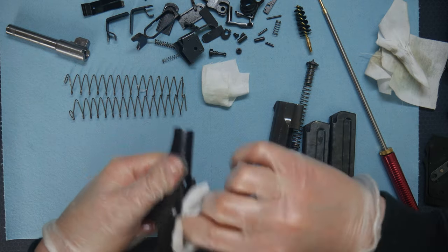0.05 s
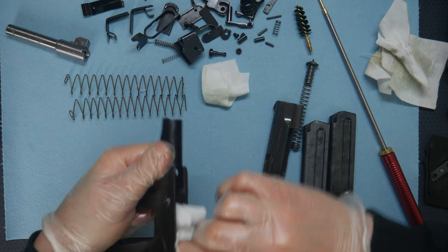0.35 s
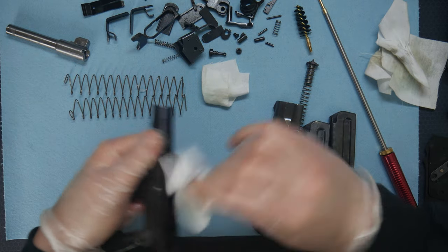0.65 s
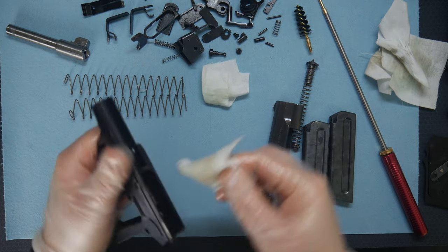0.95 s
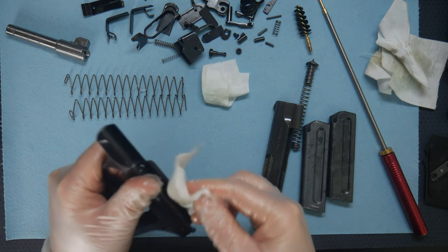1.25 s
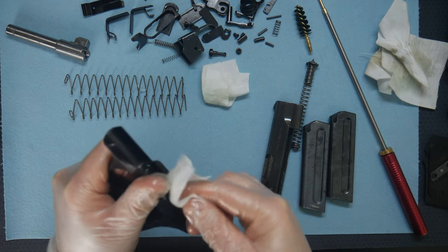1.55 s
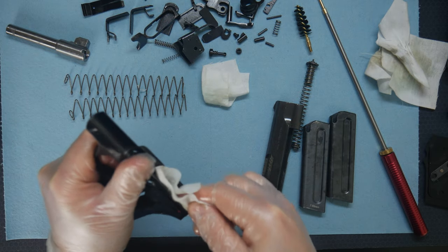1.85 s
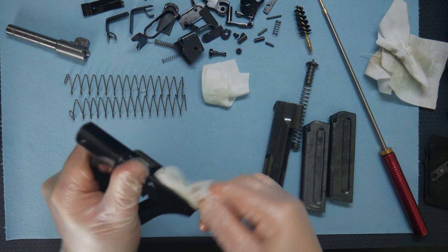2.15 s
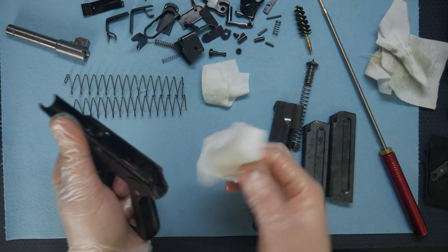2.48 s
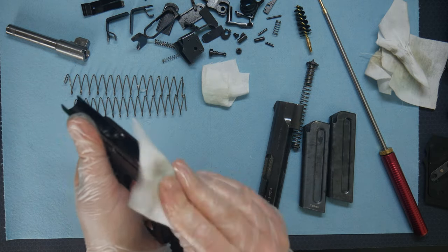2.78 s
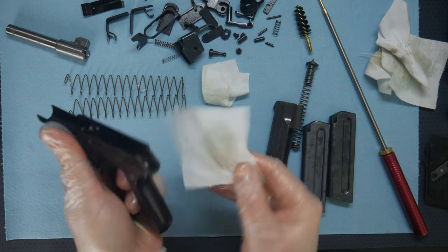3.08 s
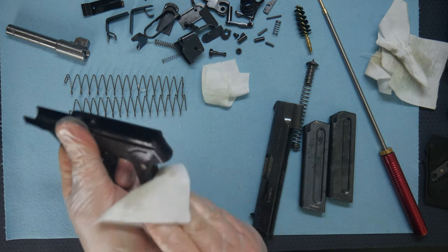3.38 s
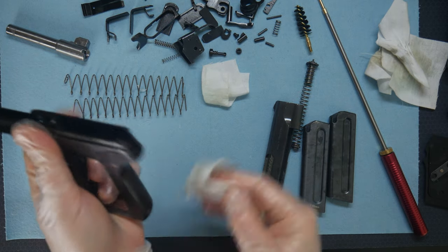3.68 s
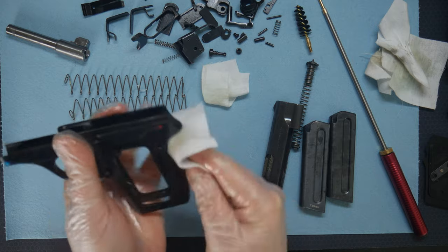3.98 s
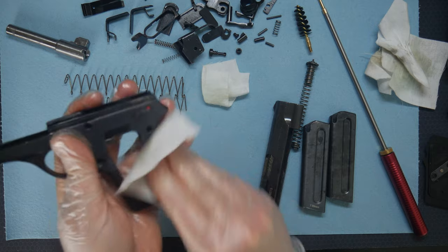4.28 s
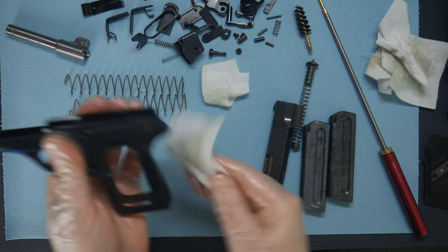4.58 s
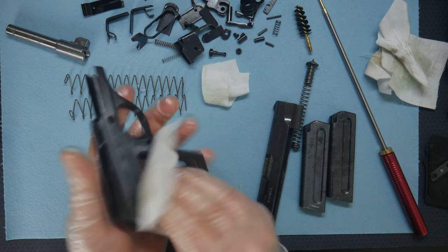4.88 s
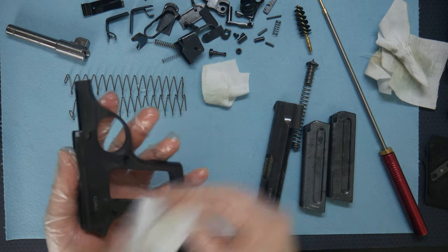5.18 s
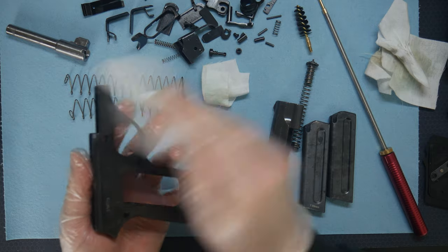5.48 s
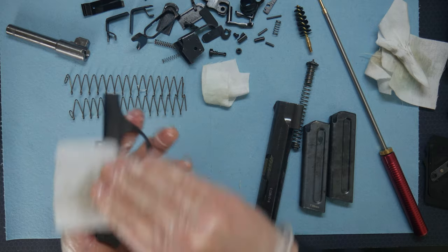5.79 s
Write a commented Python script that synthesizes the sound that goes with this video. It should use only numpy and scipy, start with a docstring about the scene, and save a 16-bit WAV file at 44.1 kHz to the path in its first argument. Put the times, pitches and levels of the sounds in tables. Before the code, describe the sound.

A short, bright swish of cloth on a metal pistol frame comes first, with a sharp little tick. Uneven wiping strokes follow, sparse at first and busier in the second half. Gloves rub dully on the grip, hands bump a padded table with soft, low thuds, and a metal edge squeaks faintly now and then. The microphone is close, in a small, quiet room.

```python
"""A short, bright swish of cloth on metal comes first: gloved hands wipe a pistol frame, close up.
Fibres catch and slip in uneven strokes, coloured by the frame's modes, and the gloves rub dully on
the grip. Threads snag with a tick, and now and then friction sets an edge singing softly.
The hands bump the padded work table, which thuds. The room is small and quiet; a noise suppressor
holds down the preamplifier hiss and a faint electrical whine."""
import sys
import numpy as np
from scipy import signal
from scipy.fft import rfft, irfft
from scipy.io import wavfile

SR = 44100
rng = np.random.default_rng(int(sys.argv[2]) if len(sys.argv) > 2 else 0)


def store_wav(level_fs):
    """Save 16-bit WAV to argv[1]."""
    pcm = np.round(np.clip(np.atleast_2d(level_fs), -1, 1) * 32767)
    wavfile.write(sys.argv[1], SR, pcm.T.astype(np.int16))


N = 261954
TIME = np.arange(N) / SR
FREQ = np.maximum(np.fft.rfftfreq(2 * N, 1 / SR), 1)

# Levels in the tables are relative, ahead of the mix.
# wiping strokes: middle t/s, length/s, level/dB, change in scrape with pressure/dB
WIPE_STROKES = [ (.043, .07, -50, 0), (0.253, 0.07, -49.5, 7), (.462, 0.071, -51, 0.5),
                (0.631, 0.077, -63.5, -2), (0.74, 0.26, -80.5, 9), (.868, .016, -62, 7.5),
                (1.501, 0.068, -66, -2.5), (1.716, .13, -51, 1), (2.23, 0.098, -65.5, 2.5),
                (2.419, 0.045, -61.5, -9.5), (2.857, 0.18, -66, -0.5), (3.093, 0.3, -70, 5),
                (3.357, 0.093, -52, -4.5), (3.494, 0.15, -58.5, -5), (3.651, .06, -66, 7),
                (3.78, 0.091, -55, -2), (3.866, 0.049, -58, 4), (3.92, 0.052, -52.5, 2.5),
                (4.015, 0.17, -64.5, -7), (4.145, 0.052, -58.5, -17), (4.276, 0.24, -58, -7),
                (4.377, 0.072, -68.5, 13), (4.533, 0.077, -64.5, -1), (4.689, .059, -53, -9.5),
                (4.768, 0.11, -58, -17), (4.869, 0.067, -52, -1), (4.953, 0.083, -58.5, -5.5),
                (5.042, 0.033, -56.5, -0.5), (5.167, 0.15, -60.5, 1), (5.179, 0.031, -44.5, -8),
                (5.622, 0.082, -56.5, 1.5), (5.77, 0.061, -51, -1), (5.843, 0.22, -58, -3)]
# the cloth whips off the end of the frame with a bright fizz: middle t/s, level/dB
CLOTH_FLICKS = [(4.871, -42.5), (5.18, -50)]
# the cloth's three tones, bright swish, midrange scrape and airy fizz: f/Hz, level/dB
SWISH_SPECTRUM = [(1500, -16.5), (3100, -3.5), (3800, 0.5), (5500, 8), (7800, 5.5), (9300, -1.5),
                  (11500, -13)]
SCRAPE_SPECTRUM = [(400, -21), (600, -8), (820, -5), (1080, -1.5), (1500, 1.5), (2200, 0.5), (3000, -3.5),
                   (4500, -2)]
FIZZ_SPECTRUM = [(6500, -20.5), (9000, -7.5), (11000, -15), (12500, -17), (15500, -21)]
# modes of the hand-damped frame: f/Hz, width/Hz, level/dB
FRAME_MODES = [(1690, 580, -29), (1975, 12, 1.5), (3770, 10, 9.5), (4064, 19.7, 12), (4566, 220, -1.5),
               (5150, 92, -5), (5990, 120, -2.5), (6480, 41, 8.5), (7080, 150, 0.5), (8250, 360, -2),
               (8800, 59, -14), (11600, 150, -4)]
# dull rub of a glove: f/Hz, level/dB
GLOVE_SPECTRUM = [(20, -0.5), (50, 6), (110, 3.5), (200, -2.5), (330, -8.5), (470, -1.5), (650, -8.5),
                  (1600, -37)]
# the holding hand takes a new grip: middle t/s, length/s, level/dB, hollow of the hand f/Hz
REGRIPS = [(0.276, 0.13, -60.5, 120), (0.582, 0.053, -70.5, 235), (0.944, 0.17, -76.5, 327),
           (2.206, 0.16, -65.5, 206), (2.796, 0.091, -60.5, 232), (3.296, 0.14, -64.5, 265),
           (3.514, 0.074, -59, 206), (3.689, 0.029, -58, 292), (4.208, 0.03, -53.5, 235),
           (4.383, 0.077, -65.5, 422), (5.127, 0.038, -60.5, 310), (5.381, .14, -60.5, 337)]
# the cloth catches on an edge and lets go: t/s, peak level/dB, band centre f/Hz
THREAD_SNAGS = [(0.2365, -28, 7600), (0.866, -46, 6000), (1.188, -51.5, 2600), (2.991, -61, 2920),
                (3.33, -44, 8860), (3.859, -41, 4540), (4.7475, -39.5, 4230), (5.039, -44.5, 5340),
                (5.6, -57, 5070), (5.776, -39, 5500)]
# a thin edge sings once the cloth bites on it: t/s, length/s, level/dB, mode f/Hz
EDGE_NOTES = [(0.246, .04, -47.5, 3770), (1.444, 0.096, -58.5, 3626), (1.684, 0.043, -47, 3984),
              (2.209, 0.057, -57.5, 3620), (2.81, .14, -64, 3654), (4.737, 0.085, -60, 3660)]
# hands bump the table: t/s, peak level/dB, contact time/s
TABLE_BUMPS = [(0.849, -48.5, 0.0021), (1.029, -44, 0.011), (1.149, -45, 0.018), (1.296, -53.5, 0.019),
               (1.545, -32.5, 0.003), (1.969, -31, 0.0037), (2.463, -35, 0.0035), (2.517, -35.5, 0.046),
               (2.918, -45.5, 0.0082), (3.327, -32.5, .0075), (3.368, -36.5, .018), (3.409, -38, 0.0028),
               (3.496, -45, 0.0036), (3.781, -36.5, .0043), (4.199, -41.5, 0.00051), (4.232, -36.5, 0.0037),
               (4.449, -40, 0.013), (4.625, -38, 0.0057), (5.025, -43.5, 0.0072), (5.237, -40, 0.0043),
               (5.699, -37.5, 0.0062)]
# low modes of the table: f/Hz, width/Hz, level/dB
TABLE_MODES = [(37.2, 6.3, 0.5), (58.8, 16.8, 12.5), (89, 9, -15), (157.5, 20, -8), (221.5, 57, -13.5)]
# preamplifier hiss: f/Hz, level/dB
HISS_SPECTRUM = [(50, 12), (130, 4.5), (300, 6), (700, 11), (2500, 1), (7000, 8.5), (11500, -1),
                 (15000, -12)]


def undb(db):
    """Decibels to gain."""
    return 10 ** (np.asarray(db) / 20)


def unit(x):
    """Scale to rms 1."""
    return x / np.sqrt(np.mean(x ** 2))


def through(x, response):
    """Filter by a frequency response."""
    return irfft(rfft(x, 2 * N) * response)[..., :N]


def colour(points):
    """EQ curve through (f/Hz, level/dB) points, falling 20 dB an octave beyond its ends."""
    hz, db = np.transpose(points)
    octaves_out = np.maximum(np.log2(hz[0] / FREQ), 0) + np.maximum(np.log2(FREQ / hz[-1]), 0)
    return undb(np.interp(np.log(FREQ), np.log(hz), db) - 20 * octaves_out)


def resonance(hz, width_hz):
    """Response of one mode, gain 1 at its centre."""
    return 1 / (1 + 1j * (FREQ / hz - hz / FREQ) * hz / width_hz)


def wander(rate_hz):
    """Random modulator with a spread near 1, gliding to a new value rate_hz times a second."""
    knots = rng.standard_normal(8192)
    return 1.2 * np.interp(TIME * rate_hz, np.arange(len(knots)), knots)


def swell(middle, length, flatness):
    """Envelope of one hand movement: it gathers speed and stops; about half strength at either end."""
    away = np.abs(TIME - middle)
    return np.exp(-(away / length) ** 4) / (1 + (2 * away / length) ** flatness)


def slips(per_s, scatter_db):
    """Friction grains: fibres let go at random moments, each with its own strength."""
    letting_go = rng.random(N) < per_s / SR
    return unit(letting_go * rng.standard_normal(N) * undb(scatter_db * rng.standard_normal(N)))


def drag(pressed=False):
    """Envelope of the wiping; pressed counts in how the pressure of each stroke changes its scrape."""
    return np.sqrt(sum((undb(db + pressed * press_db) * swell(middle, length, flatness=4.4)) ** 2
                       for middle, length, db, press_db in WIPE_STROKES))


def cloth(scrape_db=-9, fizz_db=-6, crackle_db=-11, brush_db=-82, flick_s=0.041):
    """Dense fibre slips swish over the frame; pressure adds scrape, flicks fizz, stiff creases crackle."""
    brush = undb(brush_db + 0.96 * np.tanh(wander(12)))  # loose cloth still brushes between strokes
    flicks = sum(undb(db) * swell(middle, flick_s, flatness=3.4) for middle, db in CLOTH_FLICKS)
    wipe = drag()
    swish = np.hypot(wipe, brush)
    scrape = np.hypot(undb(scrape_db) * drag(pressed=True), undb(-4) * brush)
    fizz = np.hypot(undb(fizz_db) * wipe, undb(-5) * brush + flicks)
    metal = 1 + sum(undb(db) * resonance(hz, width) for hz, width, db in FRAME_MODES)
    folds = undb(1.68 * wander(70) + 0.57 * wander(490))  # folds and weave make the drag uneven
    crackle = undb(crackle_db) * slips(per_s=140, scatter_db=1.5)
    out = 0
    for envelope, band in ((swish, SWISH_SPECTRUM), (scrape, SCRAPE_SPECTRUM), (fizz, FIZZ_SPECTRUM)):
        grains = slips(per_s=11000, scatter_db=0.5) + crackle
        out += envelope * unit(through(grains, colour(band) * metal))
    return hand_cavities(folds * out)


def hand_cavities(x, depth_db=3.0, rate_hz=30, count=26):
    """Moving hands open and close small cavities, so neighbouring bands swell and fade on their own."""
    band_index = np.interp(np.log(FREQ[::2]), np.log([500, 16000]), [0, count - 1])
    spectrum = rfft(x)
    bands = (irfft(spectrum * np.maximum(1 - np.abs(band_index - k), 0), N) for k in range(count))
    return sum(band * undb(depth_db * wander(rate_hz)) for band in bands)


def cupped(rub, hz, width_hz=36, ring_db=19):
    """Rubbing rings the hollow of the hand at one pitch."""
    ring = signal.lfilter(*signal.iirpeak(hz, hz / width_hz, fs=SR), rub)
    return unit(rub + undb(ring_db) * ring)


def gloves(hollow_hz=227, creep_db=-74.5, stroke_db=-51.5, jolt_db=-32.5, fidget_db=-90, wrists_db=-69):
    """Gloves stick and slip on the grip with each stroke, bump and new hold; wrists nudge the table."""
    rub = unit(undb(2 * wander(40)) * through(slips(per_s=2600, scatter_db=2.5), colour(GLOVE_SPECTRUM)))
    jerks = undb(4 * np.tanh(2 * wander(22)))  # the glove either sticks or slides
    creep = undb(creep_db) * (drag() / undb(stroke_db)) ** 0.17  # creep_db under an ordinary stroke
    jolts = sum(undb(db + jolt_db) * swell(at, length=0.046, flatness=1.5) for at, db, _ in TABLE_BUMPS)
    holding = (undb(fidget_db) + creep + jolts) * jerks * cupped(rub, hollow_hz)
    regrips = sum(undb(db) * swell(middle, length, flatness=2.8) * cupped(rub, hz)
                  for middle, length, db, hz in REGRIPS)
    nudges = np.sign(slips(per_s=16, scatter_db=0))
    wrists = unit(through(nudges, resonance(hz=52, width_hz=45) ** 3))
    return holding + regrips + undb(wrists_db) * wrists


def snags(snap_s=0.0019, tail_db=-12, tail_s=0.0057, band_ratio=1.11):
    """A thread snaps free: a tick of narrow-band noise with a short tail."""
    out, t = np.zeros(N), TIME[:2048]
    envelope = np.exp(-t / snap_s) + undb(tail_db) * np.exp(-t / tail_s)
    for start, db, hz in THREAD_SNAGS:
        band = signal.butter(1, [hz / band_ratio, hz * band_ratio], "band", fs=SR)
        tick = signal.lfilter(*band, rng.standard_normal(len(t)) * envelope)
        i = int(start * SR)
        out[i:i + len(t)] += undb(db) * tick / np.abs(tick).max()
    return out


def singing_edge(waver_hz=10.5, rasp_db=-6, rasp_rate_hz=600, attack_s=0.011):
    """Friction builds up one high, unsteady mode of the frame, which fades as the cloth moves on."""
    waver = waver_hz * wander(160)
    bite = undb(4.0 * wander(90))
    rasp = undb(rasp_db) * wander(rasp_rate_hz)  # quick slips roughen the tone
    out = 0
    for start, length, db, hz in EDGE_NOTES:
        age = np.maximum(TIME - start, 0)
        envelope = (1 - np.exp(-age / attack_s)) * np.exp(-(age / length) ** 2)
        out += undb(db) * envelope * np.sin(2 * np.pi * np.cumsum(hz + waver) / SR)
    return (bite + rasp) * out


def table_thuds(low_cut_hz=33, pad_hz=290):
    """Each bump is a soft push into the table's low modes; a longer contact thuds deeper."""
    body = irfft(sum(undb(db) * resonance(hz, width) for hz, width, db in TABLE_MODES))[:SR // 2]
    # slow pushes radiate little, and the padding swallows the click
    body = signal.sosfilt(signal.butter(2, low_cut_hz, "high", fs=SR, output="sos"), body)
    body = signal.sosfilt(signal.butter(5, pad_hz, fs=SR, output="sos"), body)
    out, t = np.zeros(N + len(body)), TIME[:len(body)]
    for at, db, contact in TABLE_BUMPS:
        push = (t / contact) ** 4 * np.exp(-8 * t / contact)
        thud = signal.fftconvolve(push, body)[:len(t)]
        i = int((at - contact / 2) * SR)  # the push is firmest halfway through the contact
        out[i:i + len(t)] += undb(db) * thud / np.abs(thud).max()
    return out[:N]


def room(x, t60_s=0.13, wet_db=-15, bounce_db=-15, bounce_s=0.0017, low_cut_hz=300):
    """The frame's underside radiates in opposite phase off the table; a faint stereo tail follows."""
    t = TIME[:SR // 3]
    tail = rng.standard_normal((2, len(t))) * np.exp(-np.log(1000) * t / t60_s) * (t > 0.002)
    tail = signal.lfilter(*signal.butter(2, low_cut_hz, "high", fs=SR), tail / np.linalg.norm(tail[0]))
    close = through(x, 1 - undb(bounce_db) * np.exp(-2j * np.pi * FREQ * bounce_s))
    return close + undb(wet_db) * signal.fftconvolve(close[None], tail, axes=1)[:, :N]


def whine(hz=12022, level_db=-88.5):
    """A thin, steady electrical whine under everything."""
    return undb(level_db) * np.sqrt(2) * np.sin(2 * np.pi * hz * TIME)


def suppress(x, noise, strength=2.11, floor_db=-40, size=2048):
    """Noise suppressor: each narrow band is turned down unless it stands above the steady noise."""
    bands = signal.stft(x, nperseg=size)[2]
    noise_power = np.mean(np.abs(signal.stft(noise, nperseg=size)[2]) ** 2, axis=1, keepdims=True)
    power = np.abs(bands.mean(axis=0)) ** 2 + 1e-30
    gain = np.maximum(1 - strength * noise_power / power, undb(floor_db))
    return signal.istft(bands * gain, nperseg=size)[1][:, :N]


def scene(cloth_db=-1.92, table_db=5.0):
    """The mix: every source sits dead centre, just under the microphone."""
    wiping = undb(cloth_db) * cloth() + snags() + singing_edge()
    return room(wiping + undb(table_db) * table_thuds() + gloves()) + whine()


def record(dry, hiss_db=-69, top_hz=15700):
    """Each channel's preamplifier adds hiss, a suppressor ducks it, and a steep filter cuts the top."""
    hiss = undb(hiss_db) * unit(through(rng.standard_normal((2, N)), colour(HISS_SPECTRUM)))
    quiet = suppress(dry + hiss, hiss.mean(axis=0))
    return signal.sosfilt(signal.ellip(10, 0.2, 70, top_hz, fs=SR, output="sos"), quiet)


dry = scene()
out = record(dry)
store_wav(out)
```